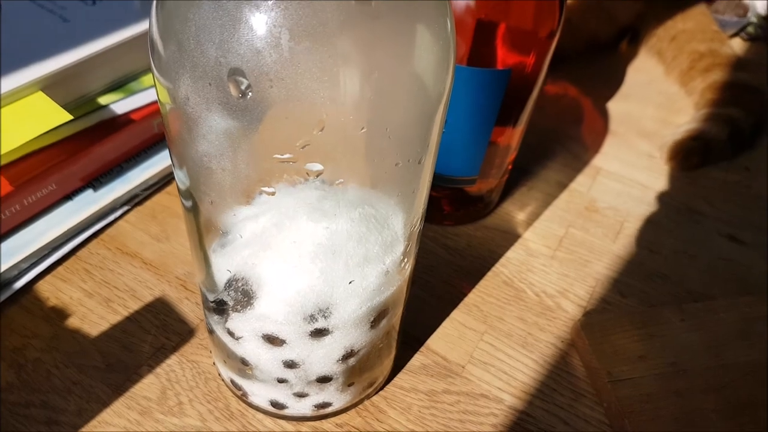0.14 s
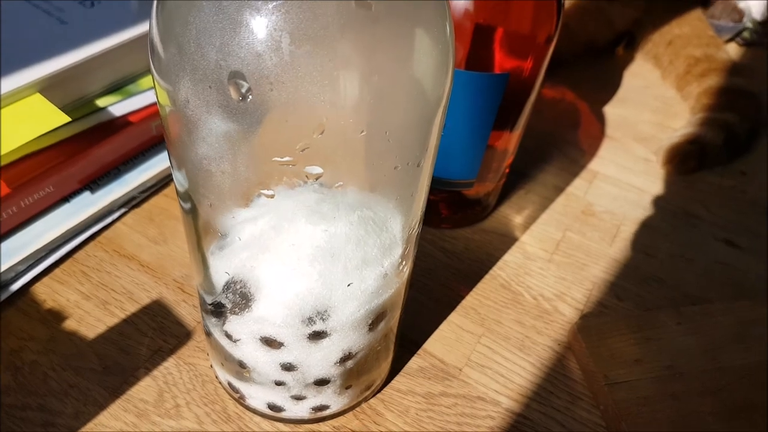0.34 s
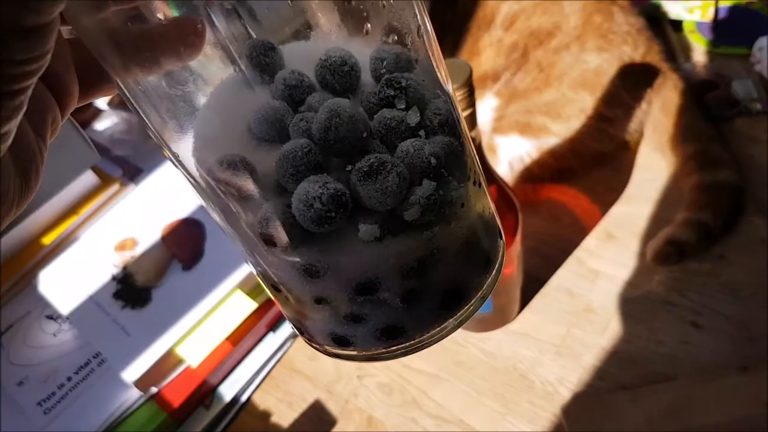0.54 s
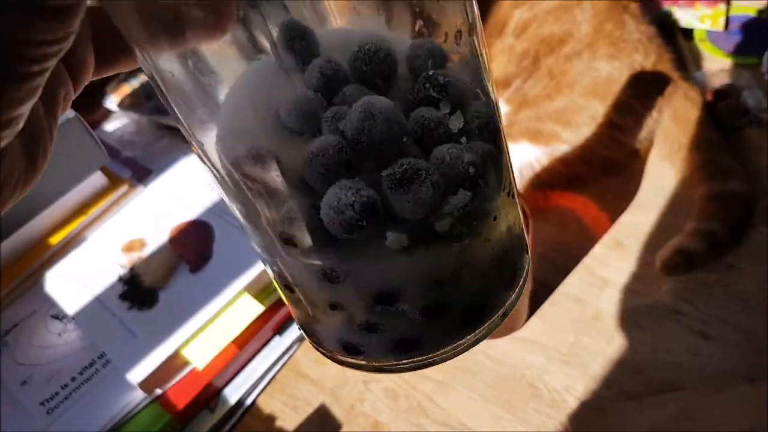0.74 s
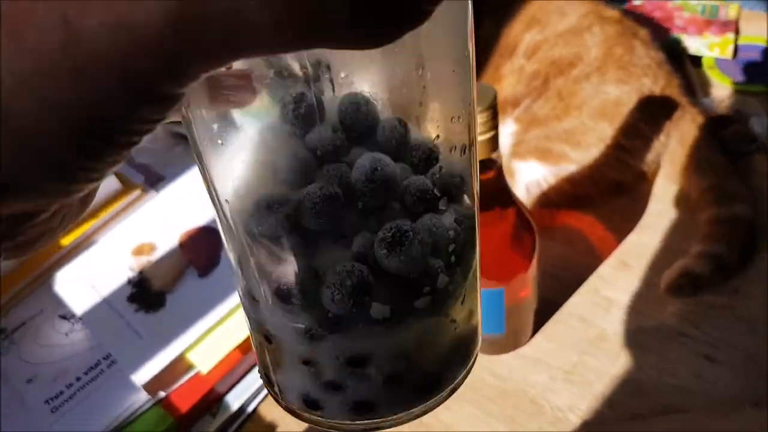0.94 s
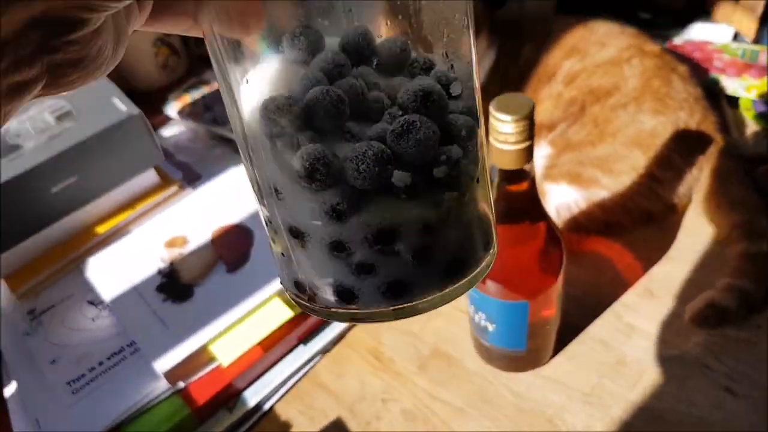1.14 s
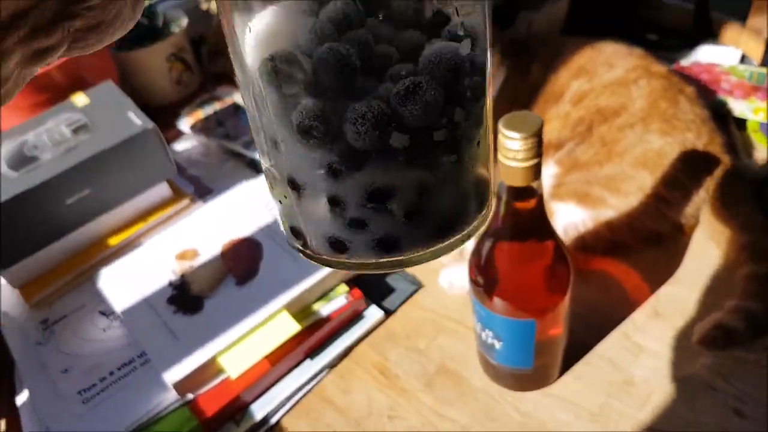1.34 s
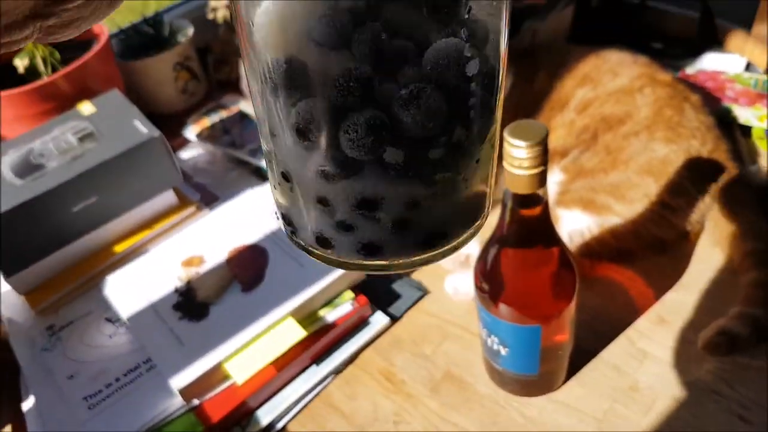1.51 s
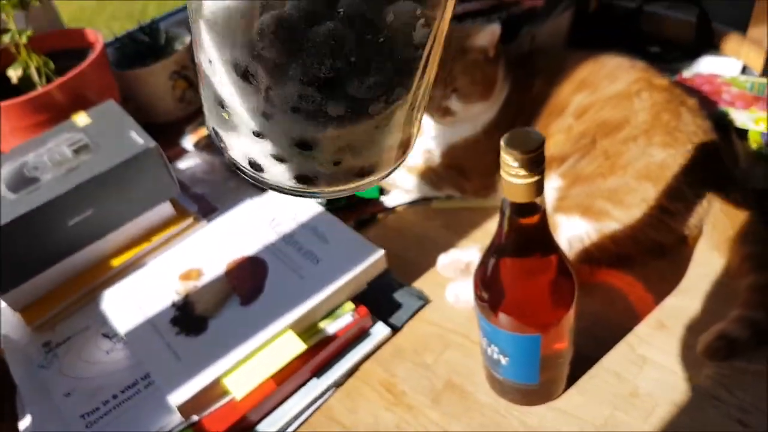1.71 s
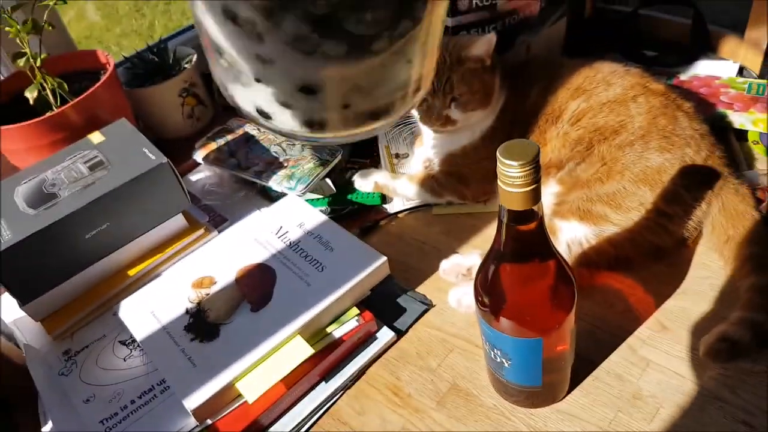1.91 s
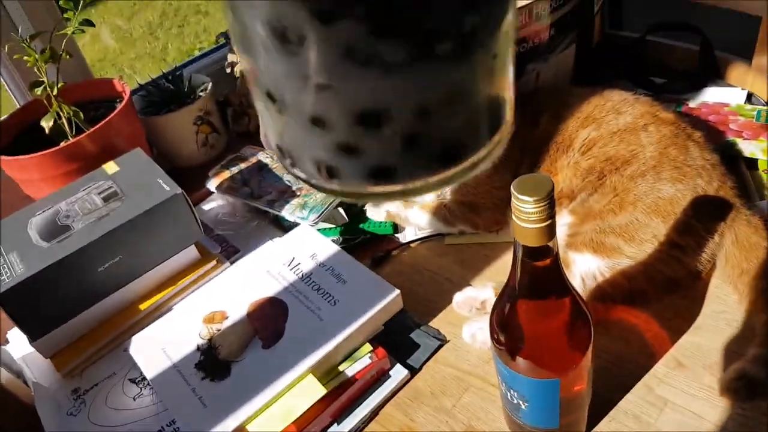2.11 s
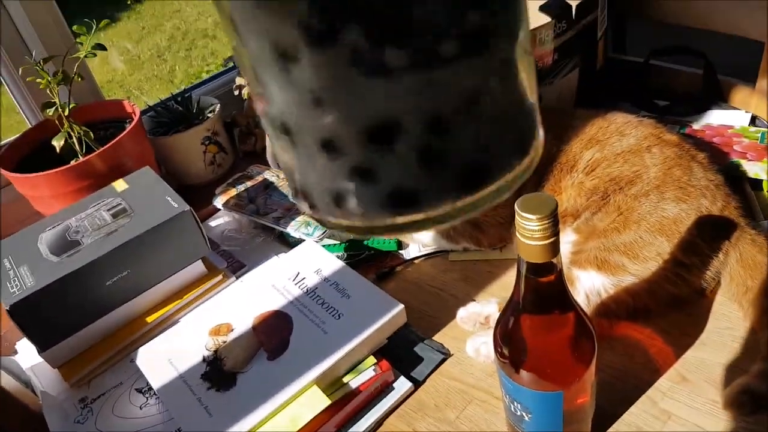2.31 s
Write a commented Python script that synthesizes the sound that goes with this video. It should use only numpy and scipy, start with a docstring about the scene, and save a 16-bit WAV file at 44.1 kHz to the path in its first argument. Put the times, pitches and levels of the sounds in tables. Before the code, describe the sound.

Hard frozen berries and sugar rattle in a glass bottle, heard close in a quiet kitchen. Until 0.7 s there is only soft room hiss, a very faint low tone and a tiny bump near 0.45. Light ticks follow, then a sharp clink at 0.98. Irregular clinks, dull knocks and grainy sugar continue, strongest near 1.56 and 2.08, with a short room tail, rattling to the end.

```python
"""In a quiet kitchen, a hand lifts a glass bottle of frozen berries and sugar and tilts it to and fro near a phone.
Berries clink on the glass: each blow is a short crack of noise plus damped sines, the modes of the wall.
Berries thud into the heap: low sines that die within a cycle or so, each with a dull puff of noise.
Between blows the heap tumbles: random clicks become small rings, berry knocks and grains of sliding sugar.
Behind them lie a short room tail, a faint low tone early on, room tone and microphone hiss."""
import sys
import numpy as np
from scipy import signal
from scipy.fft import rfft, irfft
from scipy.io import wavfile

SR = 44100
rng = np.random.default_rng(int(sys.argv[2]) if len(sys.argv) > 2 else 0)


def undo_db(level):
    """Turn decibels back into plain size, where 20 dB means ten times bigger."""
    steps = np.asarray(level, float) / 20
    return 10 ** steps


def master_out(mix):
    """Clip the mix to full scale and print it as 16-bit PCM to the path in sys.argv[1]."""
    frames = np.transpose(np.atleast_2d(mix))
    ceiling = np.clip(frames, -1, 1)
    pcm = np.round(ceiling * 32767).astype(np.int16)
    wavfile.write(sys.argv[1], SR, pcm)


N = 104164  # length in samples

# Berries hitting the glass. Each row: start in seconds, relative level of the crack in dB,
# then the ring of mode families 0, 1, 2 and 3 (low to high) in dB relative to that level.
CLINKS = [(0.7153, -44.5, -34, -5.5, -43, -33), (0.7384, -39, -26, -4.5, -37, -34.5),
          (0.762, -40, -21, -5, -39, -32.5), (0.7703, -56, -28, 7, -39, -46),
          (0.7969, -43, -41, 5, -50, -62), (0.854, -44.5, -35, 9, -40, -28),
          (0.8848, -31.5, -20.5, 1.5, -27, -25), (0.9796, -29.5, -25, -9, -34, -38),
          (0.9846, -12, -15, -8.5, -7, -37), (1.0107, -29.5, -7, -35, -37, -13.5),
          (1.1077, -33.5, -12, -10.5, -15, -38), (1.1715, -29, -17.5, -12, -30, -22),
          (1.2627, -27.5, -25, -15.5, -47, -33), (1.3534, -30.5, -22, -13, -29, -19),
          (1.3776, -36, -17, -14, -12, -7), (1.3836, -31.5, -8.5, -23, -14.5, -12),
          (1.455, -31, -38, -9, -25, -26), (1.492, -24.5, -17.5, -21, -29, -21),
          (1.5062, -33, -8, -9, -35, -18), (1.5528, -26, -13, -42, -34, -28),
          (1.56, -13, -21, -16.5, -7, -6.5), (1.6062, -26.5, -15, -7, -5.5, -13),
          (1.6266, -29, -13, -19, -42, -14.5), (1.707, -38, -21, -8, -17.5, -19),
          (1.858, -26, -16, -26, -10.5, -28), (1.8644, -26, -16, -11, -5, -18),
          (1.882, -33, -9.5, -15, -17, -15), (1.952, -45.5, -3, -22, -22, -13),
          (2.0246, -42, -30, -2.5, -35, -36), (2.0577, -44, -15, 4.5, -26, -21),
          (2.0617, -44, -15, 3, -24, -21), (2.0826, -21.5, -14, -9, -7, -7.5),
          (2.0843, -16, -11, -6.5, -7, -5.5), (2.1767, -38.5, -12.5, -31, -30, -9.5),
          (2.2103, -36, -34, -5, -20, -15), (2.2548, -26.5, -27, -16, -37, -24),
          (2.259, -23.5, -23, -10, -34, -22), (2.272, -23, -6.5, -7, -9.5, -1.5),
          (2.297, -33, -4, -6, -12, -17)]
# Tone colour of dull berry contacts. Each row: frequency in Hz, relative level per Hz in dB.
KNOCK_COLOUR = [(150, -26), (330, 1), (700, -6), (1200, 0), (1800, -6.5), (2600, -1), (4000, -11.5),
                (7000, -32)]

CONTACT_S = 0.00048  # time constant of the soft start of a contact, seconds
LEAD_S = 0.00017  # sound reaches the left microphone port this much earlier, seconds


def glass():
    """Big blows and a stream of small ones ring the same damped modes of the bottle wall."""
    # Wall modes. Each row: family number, frequency before detuning in Hz, relative level in dB,
    # time to fall by 60 dB in seconds, left minus right in dB, extra lead of the left port in cycles.
    modes = [(0, 2240, 2, 0.01, -4.5, 0.041), (0, 2594, 1, 0.031, 1, 0.25),
             (0, 3450, -6.5, 0.0067, -17.5, 0.05), (1, 4520, -3, 0.026, -1.5, 0.0068),
             (1, 4670, -8, 0.0056, 6, 0.024), (2, 5890, -8.5, 0.012, -1, .1),
             (2, 6240, -16, 0.044, -1, 0.19), (2, 6370, 1, 0.022, 5, 0.21),
             (3, 7434, -7.5, 0.019, 14.5, 0.29), (3, 8155, -4, 0.016, 6, 0.34),
             (3, 9300, -11.5, 0.012, 1, 0.096)]
    # Balance of the small rings. Each entry: level of families 0 to 3 relative to the tumbling, in dB.
    small_db = [-6.5, 4, -13, -12]
    ring_db, scatter_db = 6, 1.2  # gain of the big rings, random spread of each mode
    detune = 0.0063  # the load shifts the modes from blow to blow: spread as a share of the pitch
    spot_detune = 0.013  # pitch step between three spots of the wall, as a share of the pitch
    rings_per_s = 480
    t = np.arange(4000) / SR
    big, small = np.zeros((2, N)), np.zeros((2, N))
    luck = rng.standard_normal((len(CLINKS), len(modes), 2))
    stream = random_clicks(rings_per_s)

    for (start, crack_db, *family_db), chances in zip(CLINKS, luck):
        for mode, (level_luck, pitch_luck) in zip(modes, chances):
            db = ring_db + crack_db + family_db[round(mode[0])] + scatter_db * level_luck
            add(big, start, undo_db(db) * ring(mode, t, detune * pitch_luck))

    # each small blow lands on one spot, and strikes every mode with its own random strength
    spot = rng.integers(-1, 2, N)
    norm = np.linalg.norm(ring(modes[1], t)[0])
    for mode in modes:
        blows = evened(stream * rng.standard_normal(N)) * undo_db(small_db[round(mode[0])]) / norm
        for k in (-1, 0, 1):
            spot_ring = ring(mode, t, spot_detune * k)
            small += signal.oaconvolve((blows * (spot == k))[None], spot_ring, axes=1)[:, :N]
    return big + small * tumble_gain(column=1)


def ring(mode, t, detune=0):
    """One wall mode at both ports: a decaying sine, later in phase at the right port."""
    family, hz, db, t60, pan_db, lead = mode
    lag_cycles = np.array([[0], [hz * LEAD_S + lead]])
    phase = 2 * np.pi * (hz * (1 + detune) * t - lag_cycles)
    decay = undo_db(db - 60 * t / t60 + pan_db * np.array([[0.5], [-0.5]]))
    return decay * np.sin(phase) * (1 - np.exp(-t / CONTACT_S))


def ticks():
    """The short wide-band crack of each contact: coloured noise with a soft start and a quick decay."""
    # Colour of the crack. Each row: frequency in Hz, relative level per Hz in dB.
    crack_colour = [(300, -32), (1500, -3), (3500, 6.5), (5500, -9), (9000, -17.5), (16000, -10.5)]
    tick_db, tick_t60 = -6, 0.022  # gain in dB, time to fall by 60 dB in seconds
    t, out = np.arange(1500) / SR, np.zeros(N)
    noise = rng.standard_normal((len(CLINKS), len(t)))
    cracks = evened(colour(noise, crack_colour))
    for row, crack in zip(CLINKS, cracks):
        decay = undo_db(tick_db + row[1] - 60 * t / tick_t60)
        add(out, row[0], decay * (1 - np.exp(-t / CONTACT_S)) * crack)
    return ports(out)


def thuds():
    """A sudden low push that dies within a cycle or so, and a puff of noise as dull as its pitch."""
    # Berries landing in the heap, and the grip of the hand.
    # Each row: onset in seconds, relative level in dB, pitch in Hz.
    landings = [(0.447, -47, 356), (0.758, -38, 600), (0.883, -41, 1220), (0.983, -26.5, 1070),
                (1.011, -32.5, 1400), (1.174, -26.5, 1140), (1.375, -25.5, 1280), (1.3814, -30.5, 1470),
                (1.491, -33, 1290), (1.505, -36, 1210), (1.5584, -29, 1270), (1.604, -38.5, 1350),
                (1.625, -38, 1230), (1.812, -56, 726), (1.861, -38.5, 1300), (1.874, -38, 1210),
                (2.054, -45, 1170), (2.0826, -31.5, 930), (2.253, -39, 1240), (2.271, -29.5, 1090),
                (2.327, -48, 700)]
    land_s = 0.002025  # the push lags its onset, seconds
    push_db, push_cycles = 6, 0.62  # gain, cycles until the push falls to about a third
    puff_db, puff_t60 = -10, 0.025  # gain, seconds to fall by 60 dB
    t, out = np.arange(2500) / SR, np.zeros(N)
    puffs = colour(rng.standard_normal((len(landings), len(t))), KNOCK_COLOUR)
    for (start, db, hz), puff in zip(landings, puffs):
        push = np.sin(2 * np.pi * hz * t) * np.exp(-t * hz / push_cycles)
        dull = signal.lfilter(*signal.butter(2, 2.8 * hz, fs=SR), puff)
        puff = evened(dull) * (1 - np.exp(-t / CONTACT_S))
        decay = undo_db(puff_db - 60 * t / puff_t60)
        add(out, start + land_s, undo_db(db) * (undo_db(push_db) * push + decay * puff))
    return ports(out)


def tumbling():
    """Berries knock on berries, each at a short pitch; sugar slides round the wall, in spurts at each knock."""
    # Colour of the sliding sugar. Each row: frequency in Hz, relative level per Hz in dB.
    sugar_colour = [(1500, -14), (3000, -1), (5500, -4.5), (7000, -9), (10000, -12.5), (13000, -16),
                    (14500, -8), (16000, -28)]
    knocks_per_s, grains_per_s = 650, 5000  # grains before the spurts and the ports shape them
    spurt_s, clump = 0.0069, 0.64  # seconds a spurt takes to fall to about a third, strength of the spurts
    sugar_db = 12.5  # gain of the whole wide band of grains
    knock_cycles = 1.08  # cycles until a knock falls to about a third
    hits = random_clicks(knocks_per_s)
    shaken = signal.lfilter([1], [1, -np.exp(-1 / (spurt_s * SR))], abs(hits))
    spurts = evened(1 + clump * evened(shaken))
    near, left, right = (random_clicks(grains_per_s) * spurts for _ in range(3))
    # mostly separate grains left and right: the sugar lies all round the wall
    sugar = evened(colour(ports(near) + 6.8 * np.array([left, right]), sugar_colour))

    t, pitches = np.arange(800) / SR, np.geomspace(400, 5000, num=16)
    berry = rng.integers(0, len(pitches), N)
    knocks = np.zeros(N)
    for k, hz in enumerate(pitches):
        knock = hz * np.sin(2 * np.pi * hz * t) * np.exp(-t * hz / knock_cycles)
        knocks += signal.oaconvolve(hits * (berry == k), knock)[:N]
    berries = evened(colour(knocks, KNOCK_COLOUR)) * tumble_gain(column=1)
    return ports(berries) + sugar * tumble_gain(column=2) * undo_db(sugar_db)


def tumble_gain(column):
    """Gain over time of the tumbling berries (column 1) or the sliding sugar (column 2)."""
    # The heap in motion. Each row: time in seconds, relative level of the berries in dB,
    # relative level of the sugar in dB.
    motion = [(0.703, -76, -95), (0.731, -62, -84), (0.842, -70, -90), (0.878, -56, -75),
              (.975, -66, -78.5), (0.989, -60, -46.5), (1.029, -66, -70), (1.07, -54.5, -65.5),
              (1.119, -55, -71), (1.16, -62.5, -75.5), (1.245, -54.5, -76), (1.324, -68.5, -84),
              (1.364, -51, -61.5), (1.409, -52, -63), (1.478, -60.5, -82), (1.511, -49, -59.5),
              (1.545, -55, -80), (1.575, -49.5, -62), (1.64, -61.5, -64), (1.722, -57, -76.5),
              (1.74, -92.5, -80), (1.831, -64, -86), (1.868, -47.5, -60.5), (1.919, -64.5, -80),
              (2.009, -62, -88), (2.033, -55, -65), (2.074, -54.5, -72), (2.092, -51, -54),
              (2.151, -61.5, -74.5), (2.238, -57.5, -68.5), (2.284, -52.5, -62.5), (2.36, -54.5, -73)]
    columns = np.transpose(motion)
    return undo_db(np.interp(np.arange(N) / SR, columns[0], columns[column], left=-120))


def random_clicks(per_s):
    """Clicks of random sign at random moments, a few of them large."""
    spread_db = 3.7
    sizes = undo_db(spread_db * np.minimum(rng.exponential(1, N), 4))
    happens = rng.random(N) < per_s / SR
    return sizes * happens * rng.choice([-1.0, 1.0], N)


def ports(x):
    """One source at the two microphone ports: the left port is nearer, so earlier and louder."""
    pan_db = 2  # left minus right
    hz = np.fft.rfftfreq(N, 1 / SR)
    late = irfft(rfft(x) * np.exp(-2j * np.pi * hz * LEAD_S), N)
    return np.array([x * undo_db(pan_db / 2), late * undo_db(-pan_db / 2)])


def evened(x):
    """Scales a sound to an average strength (rms) of 1."""
    return x / np.sqrt(np.mean(x ** 2) + 1e-20)


def read(points, hz):
    """Reads a spectrum table between its points, on a log-frequency axis."""
    f, value = np.transpose(points)
    return np.interp(np.log(hz + 1), np.log(f + 1), value)


def colour(x, points):
    """Filters the last axis by a spectrum table in dB."""
    size = x.shape[-1]
    gain = undo_db(read(points, np.fft.rfftfreq(size, 1 / SR)))
    return irfft(rfft(x) * gain, size)


def add(mix, start, sound):
    """Mixes a sound in at a start time in seconds."""
    part = mix[..., max(round(start * SR), 0):][..., :sound.shape[-1]]
    part += sound[..., :part.shape[-1]]


def room(x):
    """The room's tail: sparse echoes of random sign, each band dying at its own speed."""
    # Decay of the room. Each row: frequency in Hz, time to fall by 60 dB in seconds.
    decay_times = [(300, 0.32), (4000, 0.33), (12000, 0.21)]
    taps = np.zeros((2, SR // 2))
    slots = np.arange(150, SR // 2 - 20, 20)  # one echo at a random place in every 20 samples
    at = slots + rng.integers(0, 20, (2, len(slots)))
    np.put_along_axis(taps, at, rng.choice([-1.0, 1.0], at.shape), 1)
    hz, t, bands = signal.stft(taps, SR, nperseg=128)
    decay = undo_db(-60 * t / read(decay_times, hz)[:, None])
    tail = signal.istft(bands * decay, SR, nperseg=128)[1]
    return signal.fftconvolve(x, tail / np.linalg.norm(tail[0]), axes=1)[:, :N]


def hum():
    """A faint low tone early on, a sine that comes and goes."""
    # Strength of the tone. Each row: time in seconds, rms level in dB.
    tone_level = [(0, -70.5), (.1, -79), (.2, -80), (.25, -73), (0.359, -75), (.41, -87)]
    hum_hz = 223
    s, db = np.transpose(tone_level)
    t = np.arange(N) / SR
    gain = undo_db(np.interp(t, s, db, right=-130))
    return np.sqrt(2) * gain * np.sin(2 * np.pi * hum_hz * t)


def air():
    """Room tone and microphone hiss: coloured noise, partly alike at the two ports."""
    # Colour of the noise. Each row: frequency in Hz, relative level per Hz in dB.
    air_colour = [(20, -7), (150, -6), (300, -3.5), (600, -8), (1900, -10.5), (4800, -22.5), (9000, -28.5),
                  (13000, -23.5), (16000, -18.5)]
    # Likeness of left and right. Each row: frequency in Hz, likeness from 0 (unrelated) to 1 (same).
    likeness = [(60, 0.35), (250, 0.41), (2000, 0.032)]
    air_db = -66.5  # rms level
    a, b = rng.standard_normal((2, N))
    same = read(likeness, np.fft.rfftfreq(N, 1 / SR))
    other = irfft(same * rfft(a) + np.sqrt(1 - same ** 2) * rfft(b), N)
    return undo_db(air_db) * evened(colour(np.array([a, other]), air_colour))


def scene():
    """The bottle, its room and the quiet air."""
    bass_hz, room_db = 271, -12  # the small bottle radiates no bass; gain of the room tail
    bottle = glass() + ticks() + thuds() + tumbling()
    high_pass = signal.butter(2, bass_hz, "high", fs=SR, output="sos")
    bottle = signal.sosfilt(high_pass, bottle)
    return bottle + undo_db(room_db) * room(bottle) + hum() + air()


def band_limit(x):
    """A steep low-pass at the top of the band."""
    return signal.sosfilt(signal.butter(12, 16650, fs=SR, output="sos"), x)


def record(dry):
    """Removes the treble above the band edge, then adds a small constant offset."""
    edge_hz, offset = 16000, -0.0005  # offset as a share of full scale
    low_pass = signal.firwin(255, edge_hz, window=("kaiser", 9), fs=SR)
    finished = signal.oaconvolve(dry, low_pass[None], "same") + offset
    return band_limit(finished)


dry = scene()
out = record(dry)
master_out(out)
```